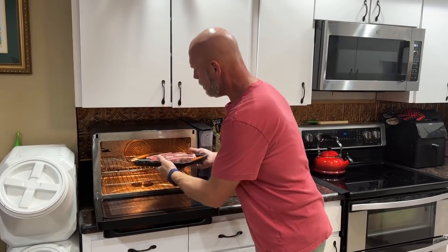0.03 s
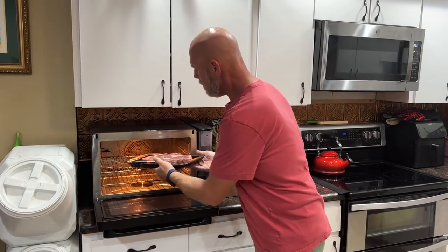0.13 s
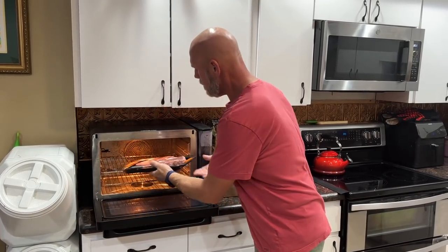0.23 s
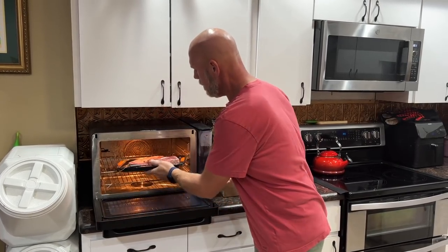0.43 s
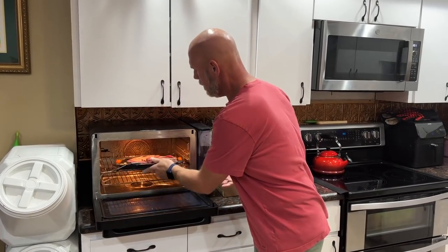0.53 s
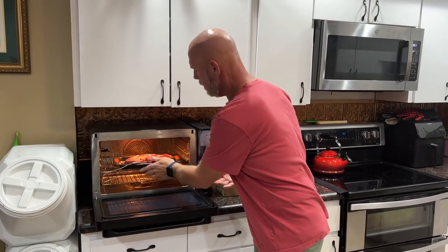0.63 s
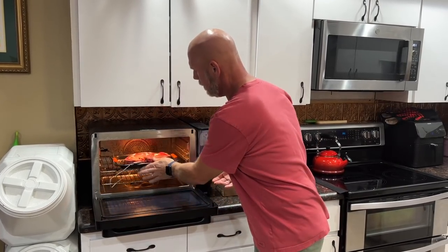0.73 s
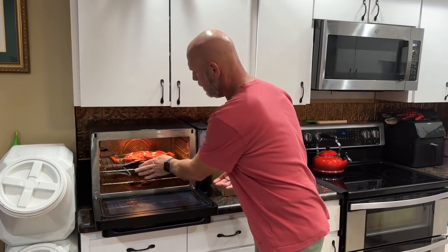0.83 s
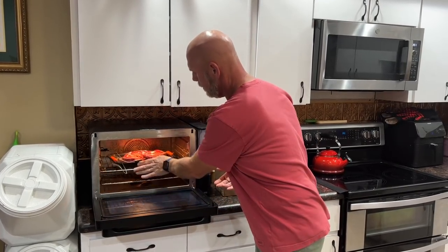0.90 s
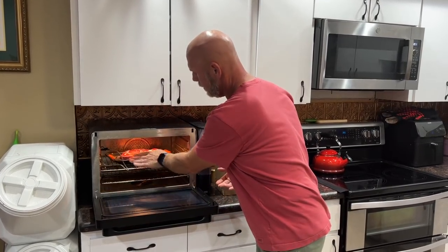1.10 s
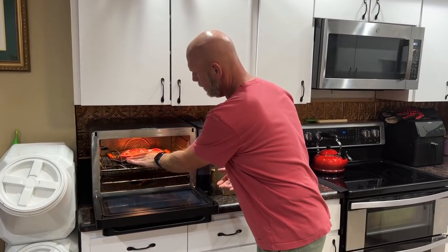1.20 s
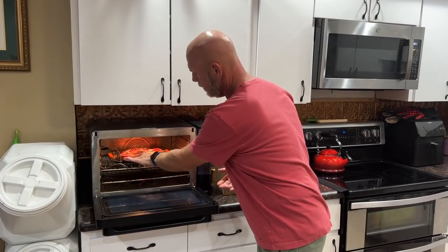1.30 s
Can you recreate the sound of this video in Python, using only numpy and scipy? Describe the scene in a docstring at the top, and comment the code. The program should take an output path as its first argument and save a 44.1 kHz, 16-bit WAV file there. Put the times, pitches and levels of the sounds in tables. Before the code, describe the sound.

A metal tray is pushed into an oven in a small kitchen. Low appliance rumble alone until 0.2 s, then sharp knocks rattle on the wire rack to 0.36 s. From 0.49 to 0.75 s it clatters and scrapes hardest, with bright clicks and brief ringing. Faint wavering tones swell around 0.75 s; soft damped taps come near 1.1 s, with light rubbing to the end at about 1.35 s.

```python
"""In a small kitchen, at the oven, a metal tray is set on a wire rack and pushed in.
It knocks and chatters on the wires and rubs along them: ticks drive the ringing modes of the metal,
and a few modes stand out as clear tones. Faint wavering tones swell late, from narrow bands of noise.
The room answers with sparse reflections over a low appliance rumble of shaped noise.
Two microphone ports sit close together, the oven nearer the left one."""
import sys
import numpy as np
from scipy import signal
from scipy.fft import rfft, irfft
from scipy.io import wavfile
from scipy.ndimage import uniform_filter1d

SR = 44100
rng = np.random.default_rng(int(sys.argv[2]) if len(sys.argv) > 2 else 0)


def nominal_scale(level):
    """Amplitude ratio for a level in decibels (scalar or array-like)."""
    x = np.asarray(level, float) / 20
    return 10 ** x


def output_pcm(signal):
    """Save a mono or channel-first signal as 16-bit PCM at the path in sys.argv[1].

    Samples are clipped to [-1, 1] before scaling.
    """
    pcm = np.clip(np.atleast_2d(signal).T, -1, 1) * 32767
    wavfile.write(sys.argv[1], SR, np.round(pcm).astype(np.int16))


N = 59535


def evened(x):
    """Scales a sound to an rms of 1."""
    return x / np.sqrt(np.mean(x ** 2) + 1e-20)


def read(points, hz):
    """Reads a table against frequency, straight between points on a log scale."""
    f, value = np.transpose(points)
    return np.interp(np.log(hz + 1), np.log(f + 1), value)


def follow(points):
    """Reads a table against time, one value per sample."""
    return np.interp(np.arange(N) / SR, *np.transpose(points))


def add(mix, start_s, sound):
    """Lays a sound into the mix from start_s on, cut at the end."""
    part = mix[:, round(start_s * SR):][:, :sound.shape[1]]
    part += sound[:, :part.shape[1]]


def alike_pair(a, b, same):
    """Left and right spectra from independent noises a and b, as alike as same says (1 = identical)."""
    return np.array([a, same * a + np.sqrt(1 - same ** 2) * b])


def clicks(size, per_s, spread_db):
    """Random ticks of either sign, a few of them large."""
    extra = np.minimum(rng.exponential(1, size), 4)
    happens = rng.random(size) < per_s / SR
    return happens * nominal_scale(spread_db * extra) * rng.choice([-1, 1], size)


def waver(lines):
    """Narrow bands of noise: tones that wander in strength."""
    out = np.zeros(N)
    for hz, width_hz, db in lines:
        r = np.exp(-np.pi * width_hz / SR)
        noise = [1, 1j] @ rng.standard_normal((2, 2 * N))
        slow = signal.lfilter([1], [1, -2 * r, r * r], noise)[N:]  # first half lets the filter settle
        carrier = np.exp(2j * np.pi * hz * np.arange(N) / SR)
        out += nominal_scale(db) * evened((slow * carrier).real)
    return out


# wavering low hum, before the slow rise: (frequency [Hz], width [Hz], level [dB])
HUM = [(53.5, 11.2, -44), (116, 14, -54), (242.8, 10.7, -51.5)]
# spectrum of the room floor, relative: (frequency [Hz], density [dB per Hz])
FLOOR = [(15, -46), (30, -17.5), (53, -1), (87, -7), (120, -4.5), (175, -37), (230, -14), (309, -20.5),
         (641, -27), (760, -23), (1100, -30.5), (3000, -42.5), (8000, -58.5), (11000, -84), (16000, -107)]
# left-right likeness of the floor: (frequency [Hz], likeness [0 to 1])
FLOOR_LIKENESS = [(60, 1), (240, 0.79), (950, 0.4), (3770, 0.25), (15000, 0.18)]
# slow change of floor and hum: (time [s], level [dB])
FLOOR_LEVEL = [(0, 1), (.6, -1), (.9, 1.5), (1.35, 2)]


def rumble():
    """Low appliance rumble: noise shaped by the room floor, with drifting patches, plus the hum."""
    frames, hz = N // 512 + 5, np.fft.rfftfreq(2048, 1 / SR)
    a, b, c, d, patches = rng.standard_normal((frames, 1025, 5)).T
    patches = uniform_filter1d(patches, size=10, axis=0)  # smooth over frequency
    patches = evened(uniform_filter1d(patches, size=6, axis=1))  # then over time
    same = np.clip(read(FLOOR_LIKENESS, hz), -1, 1)[:, None]
    spectrum = alike_pair(a + 1j * b, c + 1j * d, same)
    spectrum *= nominal_scale(read(FLOOR, hz)[:, None] + 0.99 * patches)
    noise = signal.istft(spectrum, nperseg=2048, noverlap=1536)[1][:, :N]
    floor = nominal_scale(-41) * evened(noise)
    balance = nominal_scale(np.array([[.5], [-.5]]))  # left 1 dB over right
    return (floor + waver(HUM)) * nominal_scale(follow(FLOOR_LEVEL)) * balance


# how fast the kitchen falls by 60 dB: (frequency [Hz], t60 [s])
KITCHEN_T60 = [(150, 0.46), (1000, 0.61), (5000, 0.76), (14000, 0.26)]


def kitchen(x):
    """Small-room answer: sparse reflections of random sign, each band dying at its own speed."""
    taps = np.zeros((2, 30000))
    at = np.arange(200, 29960, 20) + rng.integers(0, 20, (2, 1488))
    np.put_along_axis(taps, at, rng.choice([-1., 1.], at.shape), 1)
    taps[1] += 1.14 * taps[0]  # the ports are close and share most reflections
    hz, t, spectrum = signal.stft(taps, SR, nperseg=256)
    fall_db = -60 * t / read(KITCHEN_T60, hz)[:, None]
    tail = signal.istft(spectrum * nominal_scale(fall_db), SR, nperseg=256)[1]
    tail /= np.linalg.norm(tail, axis=1, keepdims=True)
    return signal.fftconvolve(x, tail, axes=1)[:, :N]


# faint tones, perhaps overtones of the hum, before their envelope:
# (frequency [Hz], width [Hz], level [dB])
FAINT_TONES = [(468, 22.6, -46.5), (1295, 3.6, -60)]
# their envelope: (time [s], level [dB])
FAINT_TONES_LEVEL = [(.6, -39), (.75, 3.5), (1., -2), (1.25, -4), (1.35, 0)]


def faint_tones():
    """Faint wavering tones, perhaps overtones of the hum, that swell from about 0.7 s."""
    return waver(FAINT_TONES) * nominal_scale(follow(FAINT_TONES_LEVEL))


# time constant of a mode's build-up, to which 0.1 ms is added: (frequency [Hz], rise [s])
METAL_RISE = [(100, 0.0084), (1000, 0.00069), (8000, 0.00013)]


def ring(hz, t60):
    """One dying sine per mode; low modes take longer to build."""
    t, hz = np.arange(11000, dtype=np.float32) / SR, np.float32(hz)[:, None]
    rise = np.float32(read(METAL_RISE, hz) + 1e-4)
    fall = np.float32(np.log(1000) / t60)[:, None]
    return np.sin(np.float32(2 * np.pi) * hz * t) * np.exp(-fall * t) * (1 - np.exp(-t / rise))


# dense modes of the sheet, relative strength: (frequency [Hz], density [dB per Hz])
METAL = [(47, -43), (80, -8.5), (175, -0.5), (524, -9.5), (641, -8.5), (937, -11), (1530, -11),
         (1880, -13.5), (4290, -22), (5490, -22), (8590, -26), (10000, -32.5), (11500, -29.5),
         (15400, -26.5), (16800, -76)]
# decay of the sheet, before each mode's random spread: (frequency [Hz], t60 [s])
METAL_T60 = [(100, 0.22), (400, 0.41), (1500, 0.33), (5000, 0.15), (15000, 0.19)]


def sheet_modes():
    """Frequencies, strengths and waves of 1600 modes, one at random in each slice of the spectrum."""
    edges = np.linspace(80 ** .6, 16800 ** .6, num=1601) ** (1 / .6)
    width = np.diff(edges)
    hz = edges[:-1] + width * rng.random(len(width))
    waves = ring(hz, read(METAL_T60, hz) * rng.uniform(0.64, 1.23, len(hz)))
    share = nominal_scale(read(METAL, hz)) * np.sqrt(width)
    return hz, share / np.linalg.norm(share), waves


# where bass, middle and treble strength apply: (frequency [Hz])
COLOUR_HZ = (176, 855, 5400)


def coloured(hz, treble_db, middle_db, bass_db):
    """Gain at each frequency for a contact of the given three strengths."""
    return nominal_scale(read(list(zip(COLOUR_HZ, (bass_db, middle_db, treble_db))), hz))


# left-right likeness of the tray: (frequency [Hz], likeness [0 to 1])
TRAY_LIKENESS = [(100, 1), (400, 0.68), (1500, 0.18), (4000, 0.31), (8000, 0.71), (14000, 0.83)]
# stereo balance of the tray: (frequency [Hz], left over right [dB])
TRAY_PAN = [(60, 6), (240, 0), (950, 2.5), (3770, 2.5), (15000, 0.5)]


def clatter(sheet, strength):
    """Dense ringing of the sheet: each contact drives the same modes with its own random mix."""
    hz, share, waves = sheet
    a, b = rng.standard_normal((2, len(hz)))
    same = np.clip(read(TRAY_LIKENESS, hz), -1, 1)
    pan = nominal_scale(np.outer([.5, -.5], read(TRAY_PAN, hz)))
    mix = pan * alike_pair(a, b, same) * share * coloured(hz, *strength)
    return np.float32(mix) @ waves


# modes that stand out, relative to the sheet: (frequency [Hz], level [dB], t60 [s])
TONES = [(116, 8, .3), (174, 6.5, 0.31), (266.6, 8, 0.26), (295, 4.5, 0.44), (352, 2.5, .4), (650, 9, 0.5),
         (760, 6, 0.17), (891, -8, 0.14), (1080, 14, 0.12), (1272, 9.5, 0.35), (1405, -6, 0.25),
         (1538, 10, 0.16), (1750, 3.5, 0.16), (2203, 15.5, 0.062), (2750, 15, 0.074), (3075, 12, 0.046),
         (5300, 11, 0.033), (6450, 13.5, 0.038), (7060, 4, 0.18)]


def clang(sheet, strength, favoured_hz):
    """Clear tones of tray, rack and walls; the place of contact favours those near favoured_hz."""
    hz, share, _ = sheet
    tone_hz, tone_db, tone_t60 = np.transpose(TONES)
    octaves = np.log2(tone_hz / favoured_hz)
    favour_db = 16.5 * np.exp(-(octaves / 0.11) ** 2)
    gain = nominal_scale(favour_db + tone_db) * np.interp(tone_hz, hz, share) * coloured(tone_hz, *strength)
    gain *= rng.choice([-1, 1], len(gain))
    tone = np.float32(gain) @ ring(tone_hz, tone_t60)
    return np.outer(nominal_scale(np.array([1., -1.])), tone)  # left 2 dB over right


# rubbing strength that drives the sheet: (time [s], level [dB])
SLIDE = [(.22, -83), (.24, -61), (.36, -38), (.46, -55), (.5, -30.5), (.62, -30), (.72, -29.5), (.82, -39),
         (.95, -41), (1.08, -44), (1.12, -58.5), (1.2, -47.5), (1.35, -40)]


def slide(sheet):
    """Tray rubbing along the rack: gritty ticks drive the sheet as the contact hops from wire to wire."""
    grit = evened(clicks(N, per_s=3000, spread_db=3.0)) * nominal_scale(follow(SLIDE))
    wire = rng.integers(0, 6, N // 1500 + 1).repeat(1500)[:N]
    out = np.zeros((2, N))
    for k in range(6):
        body = clatter(sheet, (-36.5, -34.0, -30.5))  # treble, middle, bass dB
        out += signal.oaconvolve(body, (grit * (wire == k))[None], axes=1)[:, :N]
    return out


# knocks of tray on rack, relative strengths:
# (time [s], treble [dB], middle [dB], bass [dB], ring favoured by the place of contact [Hz])
KNOCKS = [(.217, -41, -48, -47, 1750), (0.2252, -12, -34.5, -29, 1750), (0.2368, -12.5, -15, -22, 3075),
          (.248, -15.5, -27, -22, 116), (.275, -14, -26, -18, 1080), (.314, -16, -20.5, -20, 760),
          (.359, -23.5, -23, -32, 1405), (0.436, -57, -34.5, -28, 295), (.4880, -7.5, -36, -27, 3075),
          (.5060, -14.5, -22, -16, 6450), (.505, -39, -23.5, -25, 174), (.561, -9, -29, -33, 3075),
          (.568, -10, -15.5, -26.5, 5300), (.580, -17, -21, -23, 174), (.582, -16.5, -21, -18.5, 1538),
          (.612, -14.5, -22, -14.5, 324), (.68, -25.5, -25.5, -28, 188), (0.771, -37, -32.5, -25, 352),
          (.808, -44, -57, -51, 116), (1, -38.5, -71, -53, 2750), (1.084, -27, -25, -36, 2520),
          (1.097, -36, -31.5, -40, 1080), (1.112, -35, -30.5, -27, 760), (1.125, -43, -42, -34, 1538),
          (1.15, -45.5, -46.5, -33.5, 650), (1.33, -42, -48, -50, 5300)]


def knocks(sheet):
    """Each knock sounds the clear tones once and the sheet with a chatter of small rebounds."""
    held_from_s, held_db_per_s = .9, 159  # a hand resting on the tray damps the late taps
    out, t = np.zeros((2, N)), np.arange(2600) / SR
    for start_s, *strength, favoured_hz in KNOCKS:
        blow = nominal_scale(-8) * clicks(len(t), per_s=900, spread_db=3.5) * np.exp(-t / .012)
        blow[0] = 1  # the knock itself
        blow /= np.linalg.norm(blow)
        sheet_ring, tone_ring = clatter(sheet, strength), clang(sheet, strength, favoured_hz)
        ring_s = np.arange(tone_ring.shape[1]) / SR
        gain = nominal_scale(2.5 - held_db_per_s * (start_s > held_from_s) * ring_s)
        add(out, start_s, gain * tone_ring)
        add(out, start_s, signal.oaconvolve(gain * sheet_ring, blow[None], axes=1))
    return out


def scene():
    """Tray and faint tones, later at the right port, with the kitchen's answer and the rumble."""
    sheet = sheet_modes()
    tray = slide(sheet) + knocks(sheet) + faint_tones()
    lag_s = .00002  # the oven is nearer the left port
    delay = np.exp(-2j * np.pi * np.fft.rfftfreq(N, 1 / SR) * lag_s)
    tray[1] = irfft(rfft(tray[1]) * delay, N)
    return rumble() + nominal_scale(-8.5) * kitchen(tray) + tray


# two narrow bands where the treble drops out: (centre [Hz], width [Hz], level [dB])
GAPS = [(10196, 945, -34), (13770, 1340, -30)]


def treble_gaps_and_low_cut(x):
    """Two narrow gaps in the treble, then a low cut at 37 Hz."""
    hz = np.linspace(0, SR / 2, num=513)
    gap_db = sum(db * np.exp(-((hz - f) / (width / 2)) ** 4) for f, width, db in GAPS)
    taps = signal.firwin2(1023, hz, nominal_scale(gap_db) * (hz < SR / 2), fs=SR)
    gapped = signal.oaconvolve(x, taps[None], "same", axes=1)
    return signal.sosfilt(signal.butter(3, 37, "high", fs=SR, output="sos"), gapped)


def roll_off(x):
    """The treble ends steeply here."""
    return signal.sosfilt(signal.butter(12, 16960, fs=SR, output="sos"), x)


def record(dry):
    """The kitchen with two narrow treble gaps and a low cut, as finally heard."""
    mix = treble_gaps_and_low_cut(dry)
    return roll_off(mix)


dry = scene()
out = record(dry)
output_pcm(out)
```